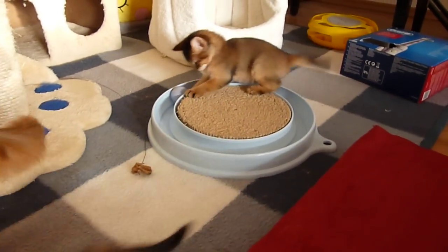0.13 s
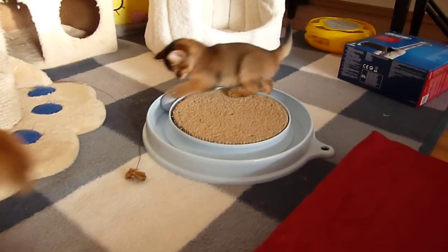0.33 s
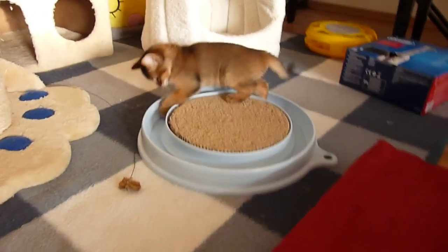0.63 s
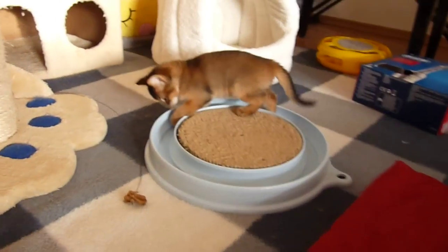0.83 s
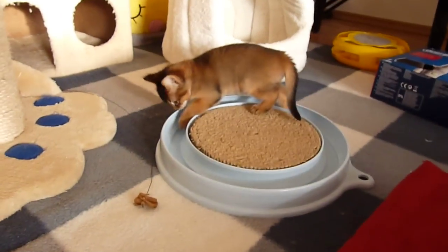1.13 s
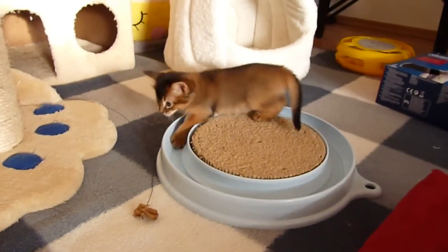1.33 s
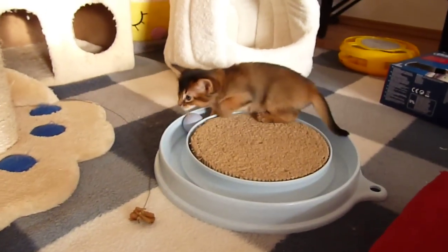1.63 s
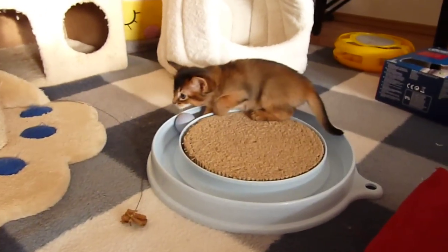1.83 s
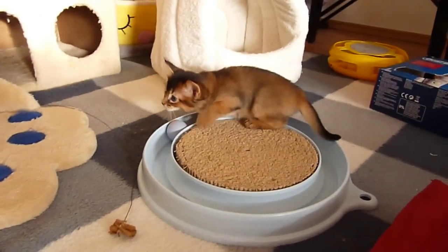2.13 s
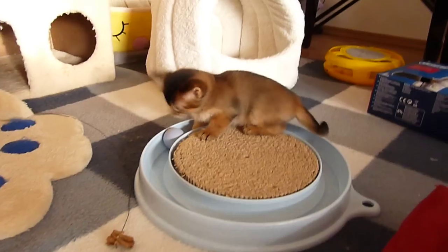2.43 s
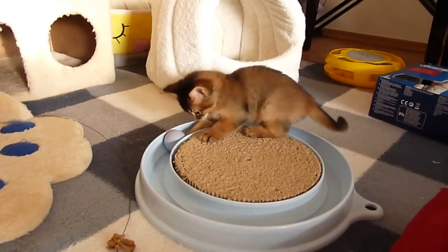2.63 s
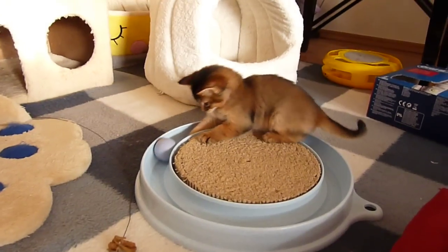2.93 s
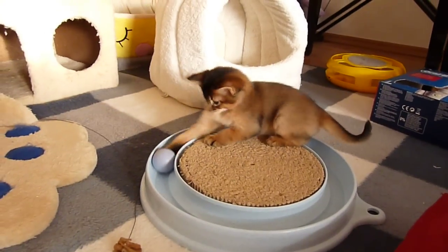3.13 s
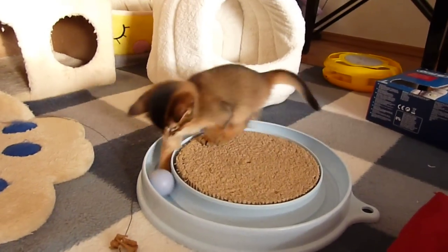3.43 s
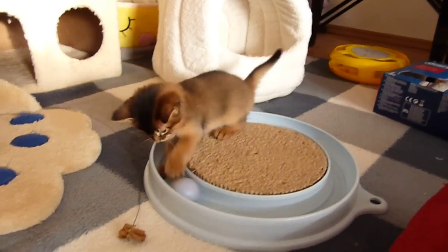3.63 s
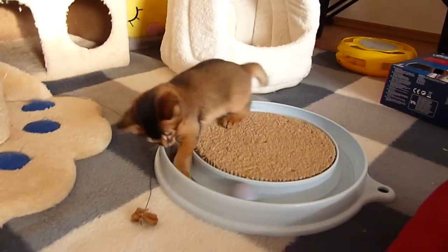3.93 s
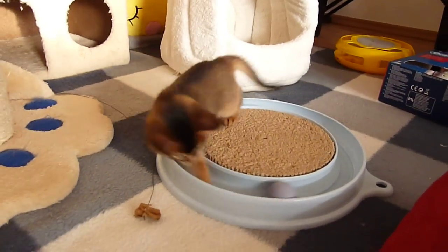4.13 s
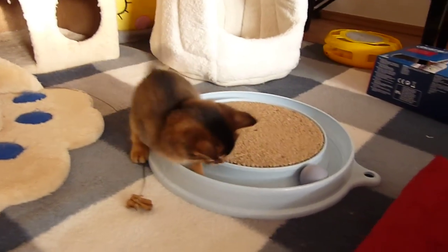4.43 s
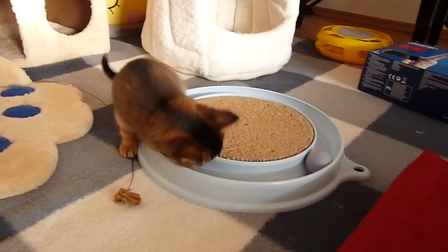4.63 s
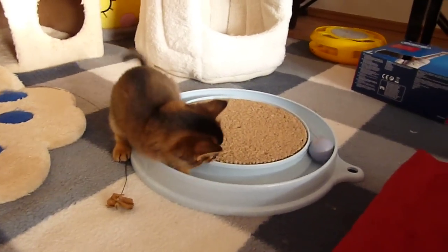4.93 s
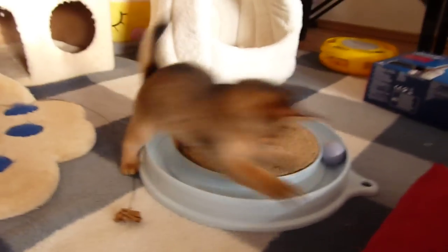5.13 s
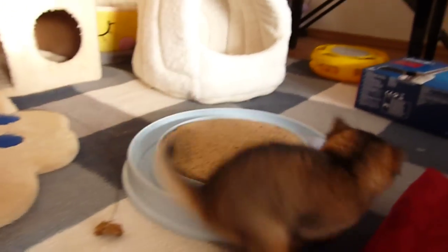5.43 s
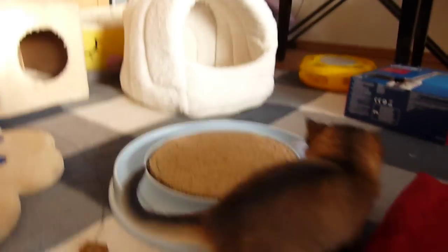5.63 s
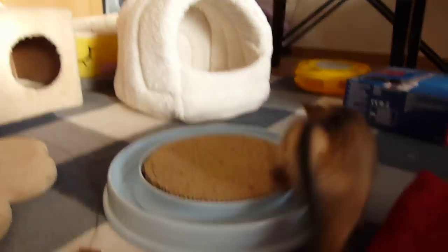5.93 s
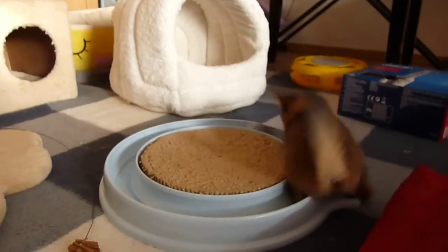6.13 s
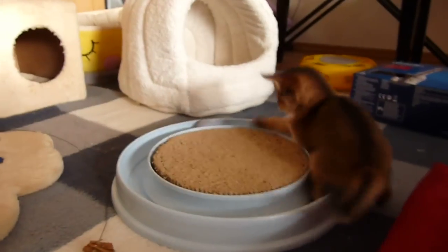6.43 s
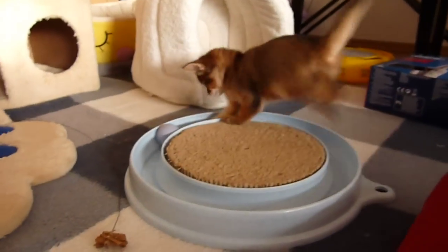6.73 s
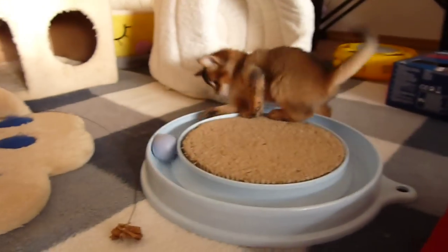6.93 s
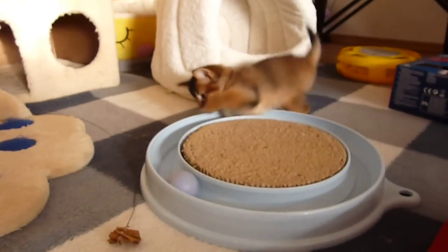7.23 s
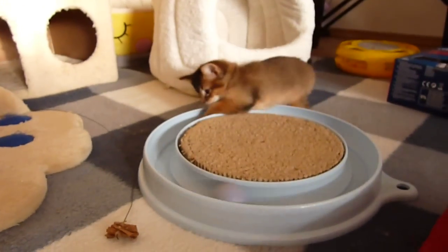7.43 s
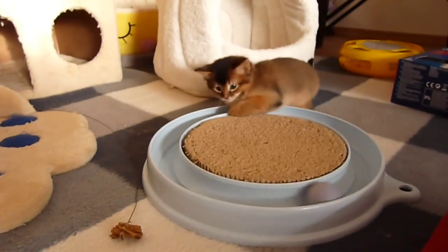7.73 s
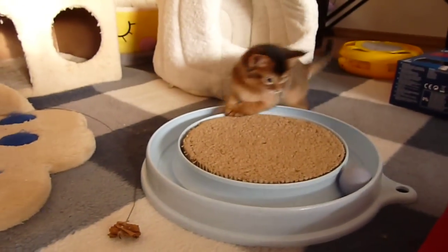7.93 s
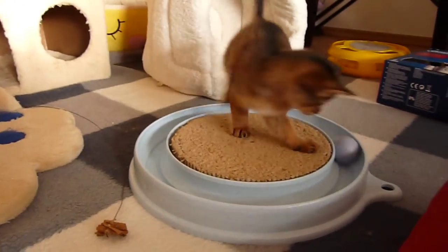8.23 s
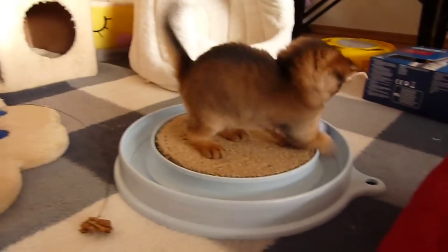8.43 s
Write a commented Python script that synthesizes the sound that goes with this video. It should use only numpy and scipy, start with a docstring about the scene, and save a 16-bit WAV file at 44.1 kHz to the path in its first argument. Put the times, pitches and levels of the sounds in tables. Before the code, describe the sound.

A quiet carpeted room with soft hiss and barely audible hums. A faint claw scratch opens, then a tiny squeak at 0.2 s and weak clacks around 0.4-0.55. From 0.65 to 1.5 s, irregular hard knocks hit close to the microphone, loudest near 0.9, 1.26 and 1.43, short and hollow with loose rattle, amid low thuds and coarse brushing that fades by 1.85. Near-quiet follows, with a light tap at 2.47. Around 2.8 a plastic ball begins stirring, and from 3.2 it rolls round a hollow track, a woody mid-low rumble with dull clacks, slowing until 5.4. Small taps come near 5.7. At 6.07 the rolling returns abruptly, louder, with dense clacks, a scratch and a minute squeak; a short firm thump lands at 6.83. Rolling and spaced clacks continue, bunching near 8.05-8.25, and the ball still rattles at the end, 8.7 s.

```python
"""A faint claw scratch and a squeak over room hiss, then hard knocks and brushing close to the microphone.
A kitten bats a plastic ball round the hollow circular track of a toy on a carpet in a quiet room.
Random bumps and blows ring the track modes; knocks are a crack, a damped ring and loose grains.
Thuds are damped low swings; brushing and claws are filtered grains; squeaks are narrow noise.
Filtered noise and wavering sines make the background; a short decaying tail makes the room."""
import sys
import numpy as np
from scipy import signal
from scipy.io import wavfile
from scipy.ndimage import uniform_filter1d

SR = 44100
rng = np.random.default_rng(int(sys.argv[2]) if len(sys.argv) > 2 else 0)


def dump_mix(stems):
    """Bounce the given channels to the path in sys.argv[1] as a 16-bit WAV at rate SR."""
    frames = np.atleast_2d(stems).T  # one column per channel
    limited = np.clip(frames, -1, 1)  # hard clip at full scale
    pcm = np.round(limited * 32767).astype(np.int16)
    wavfile.write(sys.argv[1], SR, pcm)


N = 378819
FILTER_SIZE = 8192
BINS_HZ = np.fft.rfftfreq(FILTER_SIZE, 1 / SR)
TIME_S = np.arange(N) / SR
AGE_S = np.arange(SR // 2) / SR
BAND_HZ = 8350

# ball set rolling: [start/s, stop/s, rise/s, rumble level/dB, hold/s, slowing/(dB/s), base drone re rumble/dB]
ROLLS = [(2.773, 3.203, 0.057, -59.5, 0.26, 0, -6), (3.19, 5.47, 0.18, -45.5, 0.47, 8.5, -9),
         (5.61, 5.867, 0.075, -61.5, .1, 2, -14), (6.067, 6.626, .012, -40, .2, 9, -20.5),
         (6.609, 8.279, 0.025, -42.5, .3, 1.5, -14), (8.264, 8.7, 0.15, -43, .2, 3, -19.5)]
# modes of the hollow track: [f/Hz, width/Hz, relative level/dB]
TRACK_MODES = [(182, 18, -10.5), (214, 20, -20), (266, 30, -6.5), (318, 14, 2.5), (353, 24, 2),
               (421, 11.2, 4.5), (503, 29, -2), (598, 39, -6.5), (694, 25, -12), (746.5, 16, -12),
               (804, 46, -11), (986, 72, -20), (1140, 50, -28.5), (1300, 51, -38)]
# drone band of the toy's base: [f/Hz, width/Hz]
BASE_BAND = (201.3, 98)
# ball hits the track wall: [t/s, level before trim/dB, centre f/Hz]
CLACKS = [(0.396, -40, 500), (.542, -38.5, 407), (.5564, -40.5, 427), (1.6748, -38.5, 520),
          (2.4857, -37.5, 555), (2.9436, -37, 400), (2.9612, -34.5, 440), (3.0459, -41.5, 424),
          (3.175, -38, 484), (3.221, -33.5, 500), (3.2425, -34.5, 400), (3.405, -32, 470),
          (3.4486, -29, 450), (3.511, -35.5, 343), (3.6356, -29.5, 480), (3.821, -29, 412),
          (4.04, -33.5, 446), (4.222, -31.5, 390), (4.299, -35.5, 440), (4.352, -35.5, 380),
          (4.459, -31.5, 440), (4.692, -34, 446), (5.0034, -33.5, 412), (5.098, -40.5, 463),
          (5.3532, -40, 420), (5.7877, -40, 497), (6.1069, -31.5, 410), (6.1393, -26, 470),
          (6.272, -27.5, 540), (6.401, -24.5, 457), (6.4244, -28, 440), (6.667, -25.5, 425),
          (6.7168, -33, 514), (6.804, -29.5, 524), (6.9347, -28.5, 434), (7.072, -33, 365),
          (7.3459, -28, 387), (7.6183, -28, 356), (7.6875, -36, 410), (7.7633, -25.5, 440),
          (8.054, -28.5, 490), (8.0701, -25.5, 470), (8.16, -32, 490), (8.235, -27.5, 480),
          (8.4058, -32, 437), (8.46, -31, 470), (8.4878, -32, 448)]
# sharp knocks and, last two rows, light taps on plastic: [t/s, ring level/dB, ring f/Hz, ring t60/s,
# crack re ring/dB, clatter re ring/dB]
KNOCKS = [
    (.648, -19, 500, 0.035, -12, -19.5), (.658, -14.5, 390, 0.029, -3, -23),
    (.82, -17.5, 557, 0.013, -21, -46), (0.8984, -8, 850, 0.022, -4, -20.5),
    (.911, -25, 716, 0.074, -18, -4.5), (0.9332, -23.5, 466, 0.085, -4, -5),
    (0.997, -15, 292, 0.012, -18, -21), (1.084, -28.5, 464, 0.024, -16, -26),
    (1.131, -17, 1460, 0.0079, -5.5, -26), (1.228, -28.5, 650, 0.021, -6, -13),
    (1.2614, -11.5, 534, 0.025, -4, -13.5), (1.268, -21, 746, .04, -4, -15),
    (1.282, -28.5, 1453, .04, -7, -11), (1.3266, -24, 930, .015, -.5, -6.5),
    (1.3341, -23, 320, 0.029, -20, -9), (1.3443, -18.5, 265, 0.053, -18, -22),
    (1.429, -8.5, 524, 0.0091, -13.5, -28.5), (1.447, -26, 417, .065, -15, -23),
    (1.515, -37, 436, 0.039, -8, -12), (2.467, -31, 542, 0.033, -8, -18),
    (5.3804, -35.5, 474, 0.019, 2.5, -16.5), (5.6969, -31, 1080, 0.026, -21, -18),
    (5.702, -28, 810, 0.052, -20, -33), (7.479, -39, 590, 0.011, -2.5, -13),
    (7.9119, -28, 595, 0.017, -25, -20),
    (5.6980, -38, 870, 0.027, 4, -38), (5.7020, -41, 780, 0.098, -28, -25)]
# resonances of the knocked body: [f/Hz, width/Hz, lift/dB]
SHELL_MODES = [(480, 310, 3), (680, 170, -0.5), (1080, 120, 1.5), (1380, 140, 2), (1750, 87, -0.5),
               (2600, 83, 2.5)]
# spectrum of a hard crack: [f/Hz, level/dB]
CRACK_SPECTRUM = [(60, -35.5), (200, -3), (600, -0.5), (1200, -4.5), (2000, -11), (2800, -19),
                  (4000, -33.5), (6000, -57.5), (9000, -54.5)]
# spectrum of loose clatter: [f/Hz, level/dB]
CLATTER_SPECTRUM = [(40, -40.5), (100, -9.5), (200, 4.5), (500, 3), (800, 4), (1200, -6.5), (2000, -11.5),
                    (3000, -28.5), (4200, -43.5), (8000, -61.5)]
# soft thuds of paws and body: [t/s, level/dB, f/Hz, t60/s]
THUDS = [(0.902, -29, 178, 0.36), (0.928, -33.5, 109, 0.16), (.93, -44, 71.5, 1), (1.202, -27, 117, 0.26),
         (1.233, -25.5, 170, 0.095), (1.332, -25.5, 102.5, 0.17), (1.34, -38, 70.5, .41),
         (1.378, -35.5, 125.2, 0.3), (1.867, -42, 97, 0.088), (2.189, -44, 203, 0.14),
         (3.041, -42, 108, 0.057), (3.639, -38, 194, 0.13), (4.012, -43.5, 183, 0.31),
         (5.378, -49, 55, 0.14), (6.085, -42.5, 88.4, 0.22), (6.8269, -14.5, 255, 0.024)]
# brushing near the microphone, breakpoints: [t/s, fibre level before trim/dB, body level before trim/dB]
BRUSH = [(.6, -71, -54.5), (.72, -58.5, -54), (.96, -55, -57), (1.094, -50.5, -50), (1.3, -49, -48.5),
         (1.518, -54, -46.5), (1.686, -59.5, -79), (1.85, -78, -60)]
# spectrum of brushed fibres: [f/Hz, level/dB]
RUSTLE_SPECTRUM = [(40, 1), (120, 9.5), (400, -0.5), (900, -2), (1600, -4), (2400, -9), (3200, -14),
                   (4200, -29), (8000, -44.5)]
# claws on cardboard: [t/s, length/s, level/dB]
SCRATCHES = [(.01, .14, -67), (3.265, 0.16, -65), (3.678, 0.055, -64.5), (4.566, 0.06, -67.5),
             (5.968, .06, -66), (6.062, .042, -60.5), (6.684, 0.0089, -55), (6.691, 0.22, -73),
             (8.26, 0.15, -66.5)]
# spectrum of claws: [f/Hz, level/dB]
CLAW_SPECTRUM = [(200, -13), (900, -1.5), (1700, 0), (2900, -1), (4000, -15.5), (6000, -13), (9000, -35)]
# rubbing squeaks on plastic: [t/s, length/s, level/dB, f/Hz]
SQUEAKS = [(0.202, 0.071, -59.5, 803), (5.16, 0.12, -63, 1110), (6.331, 0.016, -48, 853)]
# spectrum of room air and hiss: [f/Hz, level/dB]
AIR_SPECTRUM = [(40, -9.5), (90, -3.5), (140, -1.5), (195, -1), (280, 3.5), (430, 2.5), (620, -2),
                (740, -1.5), (815, 3), (920, -6), (1500, -11.5), (3500, -16.5), (7500, -17.5), (9000, -28)]
# faint wavering hums and a thin electronic whine: [mean f/Hz, rms level/dB]
HUMS = [(102, -78.5), (813, -73), (2665, -87), (5333, -93), (6666, -83.5), (7583, -100.5)]
# room decay: [f/Hz, t60/s]
ROOM_DECAY = [(150, 0.26), (600, 0.16), (2500, 0.052), (8000, 0.1)]


def rolling(split_hz=470, hard_corner_hz=1500, wobble_rms_db=1.52, wobble_per_s=14):
    """Bumps under the wobbling ball ring track and base; harder contacts excite the upper modes."""
    wobble = amp(wobble_rms_db * wander(wobble_per_s))
    soft, hard, low = (strength * wobble for strength in drive())
    upper_power = 1 - 1 / (1 + (BINS_HZ / split_hz) ** 8)
    lower_modes = track_gain() * np.sqrt(1 - upper_power)
    upper_modes = track_gain() * np.sqrt(upper_power) * contact(hard_corner_hz)
    base_hz, width_hz = BASE_BAND
    base_gain = 1 / (1 + (2 * (BINS_HZ - base_hz) / width_hz) ** 4)

    rumble = colour(soft * grains(N, per_s=800, spread_db=2.5), lower_modes)
    chatter = colour(hard * grains(N, per_s=600, spread_db=4), upper_modes)
    drone = colour(low * grains(N, per_s=800, spread_db=3.0), base_gain)
    return rumble + chatter + drone


def drive(stop_s=0.022, pushed_db=-0.5, settled_db=-5.5, settle_s=0.17):
    """Rumble, chatter and drone strength: a push swells, holds, then slows; chatter settles re rumble."""
    soft, hard, low = np.zeros((3, N))
    for start_s, end_s, rise_s, db, hold_s, slowing_db_per_s, drone_db in ROLLS:
        t = np.arange(round((end_s - start_s) * SR)) / SR
        attack = np.sqrt(np.minimum(t / rise_s, 1))
        release = np.minimum(t[::-1] / stop_s, 1)
        coast_s = np.maximum(t - rise_s - hold_s, 0)
        run = attack * release * amp(db - slowing_db_per_s * coast_s)
        chatter_db = settled_db + (pushed_db - settled_db) * np.exp(-t / settle_s)
        add(soft, start_s, run)
        add(hard, start_s, run * amp(chatter_db))
        add(low, start_s, run * amp(drone_db))
    return soft, hard, low


def track_gain(baffle_hz=160):
    """Power sum of the track modes; the shell radiates little bass."""
    power = sum(amp(db) ** 2 / (1 + (2 * (BINS_HZ - hz) / width_hz) ** 2)
                for hz, width_hz, db in TRACK_MODES)
    return np.sqrt(power) * BINS_HZ ** 2 / np.hypot(BINS_HZ ** 2, baffle_hz ** 2)


def contact(corner_hz):
    """A contact of finite length cuts the treble above its corner."""
    return 1 / np.hypot(1, (BINS_HZ / corner_hz) ** 2)


def clacks(trim_db=0.5, half_width_oct=0.66, damping_t60_s=0.15, tick_corner_hz=2000, tick_db=-21,
           bounce_db=-11, bounce_rise_s=0.0092, bounce_t60_s=0.14, bounce_corner_hz=1400):
    """A wall blow ticks, rings track modes near its centre and leaves the ball bouncing."""
    out, bounce_strength = np.zeros((2, N))
    tick = peaked(response(shell(CRACK_SPECTRUM) * contact(tick_corner_hz)))
    damping = decay(damping_t60_s)[:len(tick)]
    bounce_shape = rise(bounce_rise_s) * decay(bounce_t60_s)
    for s, db, hz in CLACKS:
        favour = 1 / (1 + (np.log2((BINS_HZ + 1) / hz) / half_width_oct) ** 2)
        ring = peaked(response(track_gain() * favour)) * damping
        add(out, s, amp(db + trim_db) * (ring + amp(tick_db) * tick))
        add(bounce_strength, s, amp(db + bounce_db) * bounce_shape)
    bounces = bounce_strength * grains(N, per_s=700, spread_db=0.5)
    return out + colour(bounces, track_gain() * BINS_HZ * contact(bounce_corner_hz))


def knocks(clatter_t60_s=0.24, clatter_rise_s=0.0013, ring_rise_s=0.0011, rattle_t60_s=0.14, rattle_db=-3):
    """A crack, a short hollow ring, a bright rattle of rebounds and a longer, duller clatter."""
    out = np.zeros(N)
    crack = peaked(response(shell(CRACK_SPECTRUM)))
    swell = rise(clatter_rise_s)
    for s, db, hz, t60_s, crack_db, clatter_db in KNOCKS:
        ring = np.sin(2 * np.pi * hz * AGE_S) * decay(t60_s) * rise(ring_rise_s)
        rebounds = swell * decay(rattle_t60_s) * grains(len(AGE_S), per_s=420, spread_db=-2.5)
        scatter = swell * decay(clatter_t60_s) * grains(len(AGE_S), per_s=600, spread_db=-3.5)
        rattle = amp(crack_db + rattle_db) * colour(rebounds, shell(CRACK_SPECTRUM))
        clatter = colour(scatter, shell(CLATTER_SPECTRUM))
        # clatter_db scales the rattle too
        add(out, s, amp(db) * (ring + amp(clatter_db) * (clatter + rattle)))
        add(out, s, amp(db + crack_db) * crack)
    return out


def shell(spectrum):
    """A spectrum lifted by the resonances of the knocked body."""
    lift_db = sum(db / (1 + (2 * (BINS_HZ - hz) / width_hz) ** 2) for hz, width_hz, db in SHELL_MODES)
    return amp(read(spectrum, BINS_HZ) + lift_db)


def thuds(rise_s=.003, overtone_ratio=1.8, overtone_db=-9):
    """Soft weight lands: a low damped swing with a weaker, shorter overtone."""
    out = np.zeros(N)
    for s, db, hz, t60_s in THUDS:
        phase, fade = 2 * np.pi * hz * AGE_S, decay(t60_s)
        overtone = amp(overtone_db) * np.sin(overtone_ratio * phase) * np.sqrt(fade)
        swing = np.sin(phase) + overtone
        add(out, s, amp(db) * swing * fade * rise(rise_s))
    return out


def brushing(fibre_trim_db=3, body_trim_db=2):
    """Fibres catch and slip near the microphone; the rubbed body murmurs under them."""
    s, *columns_db = np.transpose(BRUSH)
    fibres, body = (amp(np.interp(TIME_S, s, db, left=-120, right=-120)) for db in columns_db)
    slips = grains(N, per_s=1800, spread_db=2.5)
    rustle = colour(fibres * slips, amp(read(RUSTLE_SPECTRUM, BINS_HZ)))
    body_rubs = body * grains(N, per_s=560, spread_db=1.5)
    murmur = colour(body_rubs, shell(CLATTER_SPECTRUM) * contact(corner_hz=774))
    return amp(fibre_trim_db) * rustle + amp(body_trim_db) * murmur


def scratching():
    """Claws drag over cardboard: short strokes of dense slip grains."""
    slips, strokes = grains(N, per_s=2800, spread_db=-4.0), np.zeros(N)
    for s, length_s, db in SCRATCHES:
        add(strokes, s, amp(db) * signal.windows.tukey(max(round(length_s * SR), 2), .5))
    return colour(strokes * slips, amp(read(CLAW_SPECTRUM, BINS_HZ)))


def squeaks(half_width_hz=120, octave_db=-13):
    """A pad slips on plastic: noise through one narrow resonance and a faint octave above."""
    out = np.zeros(N)
    for s, length_s, db, hz in SQUEAKS:
        stroke = signal.windows.tukey(round(length_s * SR), .5)
        first, second = (1 / (1 + ((BINS_HZ / k - hz) / half_width_hz) ** 4) for k in (1, 2))
        whine = colour(rng.standard_normal(len(AGE_S)), first + amp(octave_db) * second)
        add(out, s, amp(db) * stroke * unit(whine[-len(stroke):]))
    return out


def background(air_rms_db=-59, waver_rms_hz=2.5):
    """Room air and microphone hiss as filtered noise, with faint hums that waver in pitch."""
    air_gain = amp(read(AIR_SPECTRUM, BINS_HZ)) * (BINS_HZ < BAND_HZ + 600)
    out = amp(air_rms_db) * colour(rng.standard_normal(N), air_gain)
    for hz, db in HUMS:
        drift_hz = waver_rms_hz * unit(uniform_filter1d(rng.standard_normal(N), size=4000))
        phase = 2 * np.pi * np.cumsum(hz + drift_hz) / SR
        out += amp(db) * np.sqrt(2) * np.sin(phase)
    return out


def room(x):
    """Short tail of a carpeted room: random reflections, each band dying at its own speed."""
    reflections = grains(len(AGE_S), per_s=2500, spread_db=1.5) * (AGE_S > .005)
    hz, t, bands = signal.stft(reflections, SR, nperseg=256)
    fade = amp(-60 * t / read(ROOM_DECAY, hz)[:, None])
    tail = signal.istft(bands * fade, SR, nperseg=256)[1]
    return signal.fftconvolve(x, tail / np.linalg.norm(tail))[:N]


def amp(db):
    """Decibels to gain."""
    return 10 ** (np.asarray(db) / 20)


def unit(x):
    """Scales to rms 1."""
    return x / np.sqrt(np.mean(x ** 2) + 1e-20)


def peaked(x):
    """Scales to peak 1."""
    return x / abs(x).max()


def decay(t60_s):
    """Exponential fade over AGE_S, 60 dB down at t60_s."""
    return amp(-60 * AGE_S / t60_s)


def rise(time_constant_s):
    """Exponential approach to 1 over AGE_S."""
    return 1 - np.exp(-AGE_S / time_constant_s)


def read(points, hz):
    """Interpolates a table on a log-frequency axis."""
    f, value = np.transpose(points)
    return np.interp(np.log(hz + 1), np.log(f), value)


def add(mix, s, sound):
    """Mixes a sound in at time s."""
    part = mix[max(round(s * SR), 0):][:len(sound)]
    part += sound[:len(part)]


def response(gain):
    """Minimum-phase impulse response for a gain at each of BINS_HZ, floored 100 dB below its peak."""
    log_gain = np.log(np.maximum(gain / gain.max(), 1e-5))
    circle = np.concatenate([log_gain, log_gain[-2:0:-1]])
    spectrum = np.exp(np.conj(signal.hilbert(circle)))
    return np.fft.ifft(spectrum).real[:FILTER_SIZE // 2]


def colour(x, gain):
    """Filters x by a gain curve, keeping the power of white noise."""
    taps = response(gain)
    return signal.fftconvolve(x, taps / np.linalg.norm(taps))[:len(x)]


def grains(count, per_s, spread_db):
    """A train of tiny random impacts of uneven size and sign, rms 1."""
    size = amp(spread_db * np.minimum(rng.exponential(1, count), 3))
    signed = size * rng.choice([-1, 1], count)
    return unit(signed * (rng.random(count) < per_s / SR))


def wander(per_s):
    """Slow random swing, rms 1: sines at per_s / 4 to per_s with random phases."""
    hz = np.geomspace(per_s / 4, per_s, 16)
    slow_s = TIME_S[::256]
    waves = np.sin(2 * np.pi * (hz[:, None] * slow_s + rng.random((len(hz), 1))))
    return unit(np.interp(TIME_S, slow_s, waves.sum(0)))


def scene(toy_room_db=-15, close_room_db=-17):
    """The toy sends more into the room than the close knocks, thuds and brushing."""
    toy = rolling() + clacks() + scratching() + squeaks()
    close = knocks() + thuds() + brushing()
    reverb = room(amp(toy_room_db) * toy + amp(close_room_db) * close)
    return (toy + close + reverb + background())[None]


def record(dry):
    """Low-passes at BAND_HZ and adds a small steady offset."""
    offset = -.0119
    taps = signal.firwin(161, BAND_HZ, window=("kaiser", 7), fs=SR)
    return signal.oaconvolve(dry, taps[None], "same", axes=1) + offset


dry = scene()
out = record(dry)
dump_mix(out)
```